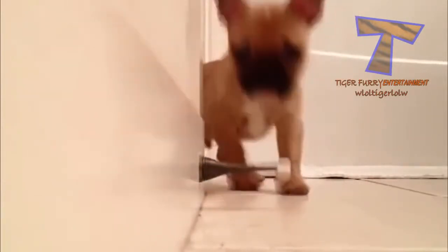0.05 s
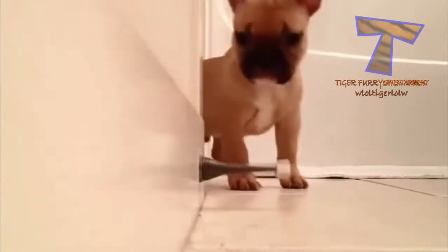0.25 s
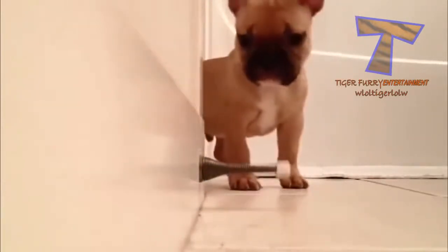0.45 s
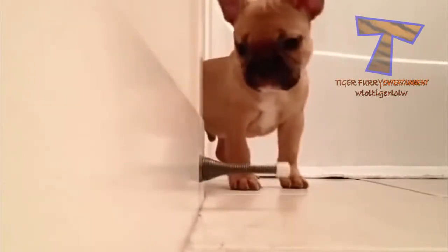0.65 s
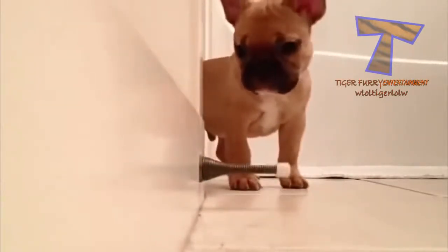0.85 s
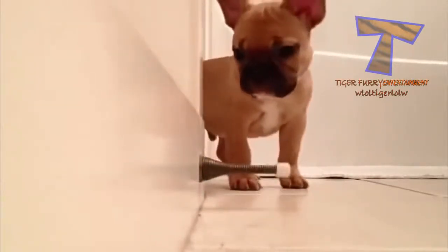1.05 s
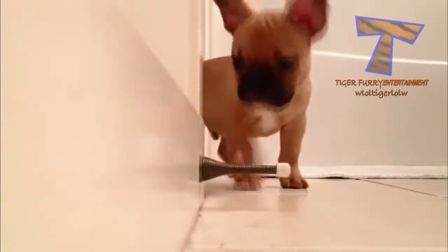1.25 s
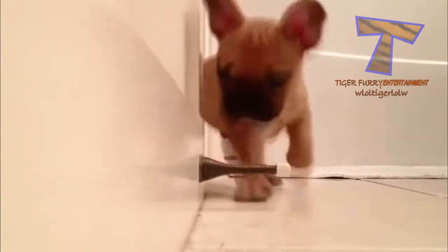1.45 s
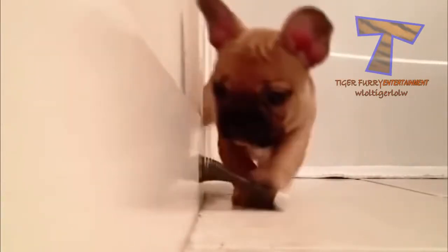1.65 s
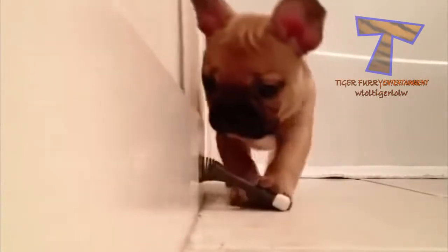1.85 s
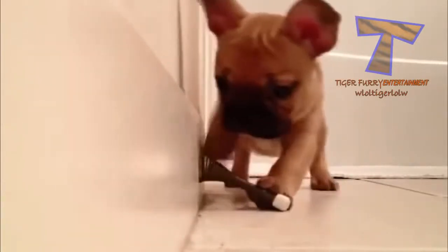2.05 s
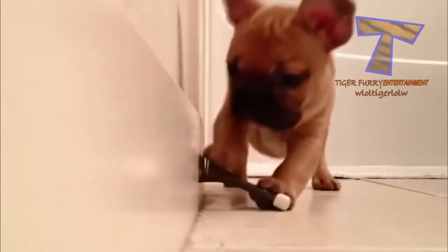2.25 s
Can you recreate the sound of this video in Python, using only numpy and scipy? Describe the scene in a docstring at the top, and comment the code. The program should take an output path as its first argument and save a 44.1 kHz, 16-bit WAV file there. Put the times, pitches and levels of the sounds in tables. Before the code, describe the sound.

A spring door stop twangs sharply, rattling into a buzzing boing that fades in a small tiled room

```python
"""A spring door stop, flicked by a puppy in a small tiled room, thrashes, settles into a buzzing boing,
then is pawed and snaps once more. Coil slaps drive filtered ticks, a dispersed wire clang and a door
knock and boom, with modal after-rings and dense reflections. Paw bumps are filtered contacts; soft
hisses (brush or sniff, sniffing breath, spring scraping) are shaped noise. Behind: a low hum of
wavering sines, noise for room air and rumble."""
import sys
import numpy as np
from scipy import signal
from scipy.fft import rfft, irfft
from scipy.io import wavfile
from scipy.ndimage import uniform_filter1d

SR = 44100
rng = np.random.default_rng(int(sys.argv[2]) if len(sys.argv) > 2 else 0)


def generate_wav(signal):
    """Clip the signal to [-1, 1] and save it as 16-bit WAV at the path in sys.argv[1]."""
    frames = np.transpose(np.atleast_2d(signal))
    scaled = np.clip(frames, -1, 1) * 32767
    pcm = np.round(scaled).astype(np.int16)
    wavfile.write(sys.argv[1], SR, pcm)


N = 101430

# slap strength through the boing: time_s, boom_db, knock_db, clang_db, tick_db
BOING_LEVELS = [(.55, -22.5, -25.5, -24.5, -26.5), (.63, -27, -30, -26, -22), (.72, -28.5, -23, -23.5, -23),
                (.8, -34.5, -29, -27, -26.5), (.87, -47, -25, -23, -26), (.925, -56, -30, -29.5, -35),
                (.955, -43, -24, -30.5, -25.5), (.985, -23.5, -24, -26.5, -23),
                (1.02, -36, -34.5, -22, -27.5), (1.075, -59, -26, -27.5, -31), (1.13, -50, -41, -57, -35.5),
                (1.185, -48, -37, -47, -47), (1.212, -35, -49, -35.5, -41),
                (1.24, -35.5, -35.5, -39.5, -38), (1.261, -50, -41.5, -38.5, -48),
                (1.29, -45, -59, -66, -48), (1.36, -61, -81, -64, -51), (1.46, -51, -67.5, -78, -59)]
# door knock through the boing: time_s, pitch_hz
KNOCK_PITCH = [(.55, 652), (.72, 637), (.88, 526), (1, 564), (1.25, 652)]
# second slap against the first: boom_db, knock_db, clang_db, tick_db
REBOUND_LEVELS = [-5, 1.9, 1.65, -6.5]
# further change of the second slap as the swing narrows: time_s, gain_db
REBOUND_FORCE_CURVE = [(.56, 2), (.64, 3), (.87, -5), (.94, -10), (1.04, -6), (1.25, 2.5)]
FIRST_SWING_S, SWING_COUNT = .5497, 31
PERIOD_S, PERIOD_SHRINK_S, PERIOD_MIN_S = .0363, .000475, .0263  # shrink per swing
REBOUND_S, REBOUND_SHRINK_S, REBOUND_MIN_S = .0143, .00044, .0058  # lag of the second slap
REBOUND_PITCH_RATIO = .97
TIME_SPREAD_S, LEVEL_SPREAD_DB, LOG_PITCH_SPREAD = .0003, 1, .1  # standard deviations


def swings():
    """Two slaps a swing; the swing shortens and the pair closes up as the spring calms."""
    n = np.arange(SWING_COUNT)
    period_s = np.maximum(PERIOD_S - PERIOD_SHRINK_S * n, PERIOD_MIN_S)
    first_s = FIRST_SWING_S + np.cumsum(period_s) - period_s
    second_s = first_s + np.maximum(REBOUND_S - REBOUND_SHRINK_S * n, REBOUND_MIN_S)

    level_s, *level_columns = np.transpose(BOING_LEVELS)
    first_db = np.transpose([np.interp(first_s, level_s, column) for column in level_columns])
    force_db = np.interp(first_s, *np.transpose(REBOUND_FORCE_CURVE))[:, None]
    second_db = first_db + REBOUND_LEVELS + force_db
    pitch_hz = np.interp(first_s, *np.transpose(KNOCK_PITCH))

    chance = rng.standard_normal((2 * SWING_COUNT, 6))
    slap_s = np.r_[first_s, second_s] + TIME_SPREAD_S * chance[:, 0]
    slap_db = np.vstack([first_db, second_db]) + LEVEL_SPREAD_DB * chance[:, 1:5]
    slap_hz = np.r_[pitch_hz, pitch_hz * REBOUND_PITCH_RATIO]
    slap_hz = slap_hz * np.exp(LOG_PITCH_SPREAD * chance[:, 5])
    return np.column_stack([slap_s, slap_db, slap_hz])


# single coil slaps: start_s, boom_db, knock_db, clang_db, tick_db, knock_pitch_hz
SINGLE_SLAPS = [(.2285, -9.5, -14.5, -14, -15.5, 660), (.2438, -15, -56, -18.5, -46, 550),
                (.2485, -25, -48, -22, -24, 450), (.2692, -19, -23, -38, -17, 680),
                (.2722, -13.5, -20.5, -18, -40, 447), (.2892, -12.5, -19, -25, -29, 620),
                (.305, -27, -16.5, -47, -36, 394), (.3132, -30, -37, -22.5, -27.5, 400),
                (.3405, -11.5, -15.5, -18.5, -14.5, 413), (.3553, -14, -20, -10, -26, 734),
                (.371, -40, -27, -40, -54, 545), (.3745, -19.5, -24.5, -40, -21, 417),
                (.3943, -22.5, -19, -16, -24.5, 460), (.419, -15.5, -30, -19.5, -33, 640),
                (.4335, -16.5, -24, -28, -28.5, 430), (.4538, -23.5, -24.5, -36, -23, 464),
                (.474, -27, -18.5, -18.5, -40, 665), (.4773, -25, -38, -30, -25.5, 500),
                (.491, -23, -28, -45, -24.5, 460), (.5125, -23.5, -32, -23.5, -28, 465),
                (.5155, -40, -19, -26, -19, 676), (.529, -20, -31.5, -27.5, -55, 543),
                (.943, -53, -27.5, -49, -69, 674), (.97, -40, -30, -35, -63, 550),
                (1.0015, -25.5, -33, -42, -62, 420), (1.0233, -30, -35, -39, -31, 636),
                (2.0153, -32, -25, -27, -27, 574), (2.0212, -50, -47, -39, -55, 633),
                (2.0262, -35, -57, -32.5, -52, 527), (2.0315, -49, -44, -43, -62, 476),
                (2.092, -67, -60, -57, -46, 505), (2.1045, -52, -59, -52, -63, 493),
                (2.1135, -41, -74, -45.5, -43.5, 507)]
# colour of the door boom: freq_hz, gain_db
BOOM_COLOUR = [(30, -42), (110, -36.5), (170, -21), (240, -7.5), (370, 1), (460, 1.5), (700, -24.5),
               (2000, -71)]
# colour of the wire clang: freq_hz, gain_db
CLANG_COLOUR = [(300, -37.5), (700, 0.5), (900, -7.5), (1350, 1), (2450, -2.5), (3000, -12), (3700, -12.5),
                (4400, -9), (5300, -24), (12000, -47)]
# colour of the coil tick: freq_hz, gain_db
TICK_COLOUR = [(1500, -25), (3300, -29), (4400, -6.5), (5300, -12), (6800, -1.5), (7900, 2.5),
               (9300, -10.5), (11000, -9.5), (11900, -4), (13000, -14), (14800, -7.5), (16000, -7)]
BOUNCE_MIN_S, BOUNCE_MAX_S, BOUNCE_DB = .002, .0045, -9.5  # coils bounce once after a slap
TICK_TRIM_DB, CLANG_TRIM_DB, KNOCK_TRIM_DB, BOOM_TRIM_DB = -3, -2, -.5, -4
KNOCK_LAG_S, BOOM_LAG_S = .00064, .00089
WET_BODY_DB, WET_CLANG_DB, WET_TICK_DB = -4, -4.5, -8


def spring():
    """Slapping coils tick first and clang along the wire; the door's knock and boom follow."""
    slaps = np.vstack([SINGLE_SLAPS, swings()])
    start_s, boom_db, knock_db, clang_db, tick_db, knock_hz = slaps.T

    bounce_s = start_s + rng.uniform(BOUNCE_MIN_S, BOUNCE_MAX_S, len(start_s))
    bounces = contacts(bounce_s, tick_db + BOUNCE_DB, spread_s=.00097, scatter=3.3)
    tick_blows = contacts(start_s, tick_db, spread_s=.0012, scatter=5.2)
    tick = amp(TICK_TRIM_DB) * ring(tick_blows + bounces, TICK_COLOUR)

    clang_blows = contacts(start_s, clang_db, spread_s=.0016, scatter=1)
    chirps = dispersed(clang_blows + chatter(clang_blows))
    clang = amp(CLANG_TRIM_DB) * ring(chirps, CLANG_COLOUR)

    knock = amp(KNOCK_TRIM_DB) * knocks(start_s + KNOCK_LAG_S, knock_db, knock_hz)
    boom_blows = contacts(start_s + BOOM_LAG_S, boom_db, spread_s=.0029, scatter=.82)
    boom = amp(BOOM_TRIM_DB) * ring(boom_blows, BOOM_COLOUR)

    body = boom + knock
    ringing = door_ring(body + clang) + wire_ring(tick + clang)
    wet = amp(WET_BODY_DB) * body + amp(WET_CLANG_DB) * clang + amp(WET_TICK_DB) * tick
    return body + clang + tick + ringing + room(wet, build_s=.0032)


CHATTER_PER_S, CHATTER_FADE_S, CHATTER_DB = 700, .029, -4.5


def chatter(blows):
    """Loose coils touch at random, with an energy that fades after each blow."""
    keep = np.exp(-1 / (CHATTER_FADE_S * SR))
    energy = signal.lfilter([1 - keep], [1, -keep], blows ** 2)
    hits = rng.random(N) < CHATTER_PER_S / SR
    signs = rng.choice([-1, 1], N)
    touches = hits * signs * amp(rng.uniform(-2.1, 1.5, N))
    return amp(CHATTER_DB) * np.sqrt(energy) * evened(touches)


GLIDE_S, GLIDE_TOP_HZ = .0026, 3500  # lag two octaves below the top; no lag above it


def dispersed(x):
    """Low notes travel slower along the wire, so each click becomes a short falling chirp."""
    hz = np.fft.rfftfreq(2 * N, 1 / SR)
    slowness = np.sqrt(GLIDE_TOP_HZ / np.maximum(hz, 500))
    lag_s = GLIDE_S * np.maximum(slowness - 1, 0)
    phase = -2 * np.pi * np.cumsum(lag_s) * hz[1]  # integrated group delay
    return irfft(rfft(x, 2 * N) * np.exp(1j * phase))[:N]


KNOCK_RISE_S = .0013  # envelope peak


def knocks(times_s, levels_db, pitches_hz):
    """The door panel gives a few quickly dying swings under each slap."""
    out = np.zeros(N)
    t = np.arange(SR // 40) / SR
    for start_s, level_db, pitch_hz in zip(times_s, levels_db, pitches_hz):
        wave = t * np.exp(-t / KNOCK_RISE_S) * np.sin(2 * np.pi * pitch_hz * t)
        add(out, start_s, -10 * amp(level_db) * wave / np.linalg.norm(wave))
    highpass = signal.butter(3, 260, "high", fs=SR, output="sos")
    return signal.sosfilt(highpass, out)


# door modes: freq_hz, level_db
DOOR_MODES = [(200, -4), (243, 0.5), (274.5, -4), (320, -3.5), (329.4, -4), (365, -9), (388.5, -4),
              (417, -8), (443, -6.5), (465, -5.5), (527, -10), (607, -17.5), (648, -10.5), (678, -12.5),
              (728, -7.5), (962, -7.5), (1404, 1), (1927, -0.5)]
DOOR_RING_DB, DOOR_T60_S = -50.5, .5


def door_ring(x):
    """The struck door rings on in its own modes."""
    return amp(DOOR_RING_DB) * after_ring(x, DOOR_MODES, DOOR_T60_S)


# wire modes: freq_hz, level_db
WIRE_MODES = [(4240, -5.5), (4350, -3), (4540, -13), (7520, -20), (7730, -26), (7940, -27)]
WIRE_RING_DB, WIRE_T60_S = -60, .92


def wire_ring(x):
    """The struck wire leaves a thin, high after-ring."""
    return amp(WIRE_RING_DB) * after_ring(x, WIRE_MODES, WIRE_T60_S)


def after_ring(x, modes, t60_s):
    """Modes that ring on after every blow; the lowest lasts t60_s, higher ones die sooner."""
    t = np.arange(SR) / SR
    lowest_hz = modes[0][0]
    response = np.zeros(SR)
    for hz, level_db in modes:
        decay_db = -60 * t / t60_s * np.sqrt(hz / lowest_hz)
        response += amp(level_db + decay_db) * np.sin(2 * np.pi * hz * t)
    return signal.fftconvolve(x, response)[:N]


# paw bumps: start_s, thud_db, knock_db, scuff_db, claw_db
PAW_BUMPS = [(.046, -32, -40, -45.5, -50), (0.0601, -38.5, -65, -48, -62), (0.2185, -29, -38, -36, -80),
             (1.869, -32, -58, -42.5, -48), (1.9139, -49, -61, -56, -43)]
# colour of a paw thud: freq_hz, gain_db
THUD_COLOUR = [(30, -45), (110, -23), (180, -10), (380, 6), (500, -11), (900, -23), (2000, -63)]
# colour of a claw tick: freq_hz, gain_db
CLAW_COLOUR = [(1500, -15), (4400, -18), (6000, -12), (15000, -14)]
PAW_KNOCK_HZ, PAW_DRY_DB, PAW_WET_DB = 750, -1.5, -5


def paws():
    """Soft paws thud and scuff on the spring, claws tick, and the door behind knocks and rings."""
    start_s, thud_db, knock_db, scuff_db, claw_db = np.transpose(PAW_BUMPS)
    thud = ring(contacts(start_s, thud_db, spread_s=.0018, scatter=1), THUD_COLOUR)
    knock = knocks(start_s, knock_db, np.full(len(start_s), PAW_KNOCK_HZ))
    scuff = ring(contacts(start_s, scuff_db, spread_s=.0047, scatter=3.6), CLANG_COLOUR)
    claw = ring(contacts(start_s, claw_db, spread_s=.0039, scatter=3), CLAW_COLOUR)
    bumps = thud + knock + scuff + claw
    reflections = amp(PAW_WET_DB) * room(bumps, build_s=.0017)
    return amp(PAW_DRY_DB) * bumps + reflections + door_ring(bumps)


# soft hisses: middle_s, half_length_s, dull_db, bright_db
SOFT_HISSES = [(.052, 0.031, -58.5, -43.5), (1.49, 0.017, -57.5, -91), (1.577, 0.056, -62, -91),
               (1.69, 0.028, -60.5, -67), (1.925, 0.063, -55, -55.5), (2.116, 0.04, -81, -59)]
# colour of the dull hiss: freq_hz, gain_db
DULL_COLOUR = [(300, -9), (900, 0), (2400, 12), (3300, 0), (4300, 10), (5200, -6), (7000, 5.5), (9000, -14),
               (15000, -12)]
# colour of the bright hiss: freq_hz, gain_db
BRIGHT_COLOUR = [(1000, -11), (4500, -5.5), (5900, 0), (7000, -8), (8000, 0), (10000, -6), (12100, 3.5),
                 (13200, -9), (15000, -10), (15600, -25)]
HISS_TRIM_DB = -2


def hisses():
    """Swells of noise: a paw brush or sniff, the puppy's sniffing breath, then the spring scraping."""
    t = np.arange(N) / SR
    dull, bright = noise(DULL_COLOUR), noise(BRIGHT_COLOUR)
    out = np.zeros(N)
    for middle_s, half_length_s, dull_db, bright_db in SOFT_HISSES:
        swell = np.exp(-((t - middle_s) / half_length_s) ** 2 / 2)
        out += swell * (amp(dull_db) * dull + amp(bright_db) * bright)
    return amp(HISS_TRIM_DB) * out


# decay of the reflections: freq_hz, t60_s
ROOM_DECAY = [(200, 0.37), (530, 0.31), (1400, 0.15), (3700, 0.54), (8000, 0.087), (14000, 0.42)]


def room(x, build_s):
    """Dense reflections from tiles and walls, each band dying at its own speed."""
    t = np.arange(SR) / SR
    hz, frame_s, bands = signal.stft(rng.standard_normal(SR), SR, nperseg=256)
    decay = amp(-60 * frame_s / read(ROOM_DECAY, hz)[:, None])
    tail = signal.istft(bands * decay, SR, nperseg=256)[1][:SR]
    build = 1 - np.exp(-(t / build_s) ** 2)
    spectrum = rfft(tail * build)
    smooth_power = uniform_filter1d(abs(spectrum) ** 2, size=45)
    tail = build * irfft(spectrum / np.sqrt(smooth_power), SR)  # level spectrum
    return signal.fftconvolve(x, tail[:SR // 2])[:N]


# hum tones: freq_hz, level_db
HUM_TONES = [(120, -57), (210, -58.5), (240, -66), (271, -63)]
LOWEST_WAVER_HZ, UPPER_WAVER_HZ = .2, 5  # rms


def hum():
    """A mains hum: a nearly steady lowest tone under slightly wavering upper tones."""
    t = np.arange(N) / SR
    out = np.zeros(N)
    for k, (hz, level_db) in enumerate(HUM_TONES):
        drift = evened(uniform_filter1d(rng.standard_normal(N), size=3000))
        waver_hz = (UPPER_WAVER_HZ if k else LOWEST_WAVER_HZ) * drift
        cycles = hz * t + np.cumsum(waver_hz) / SR + rng.random()
        out += amp(level_db) * np.sqrt(2) * np.sin(2 * np.pi * cycles)
    return out


# colour of the room air: freq_hz, gain_db
AIR_COLOUR = [(25, -54), (80, -46), (140, -7), (234, 0), (572, -21), (1770, -24.5), (2690, -26.5),
              (7380, -28), (8480, -36.5), (13900, -34), (16000, -47)]
AIR_DB = -56


def air():
    """Faint room air: steady coloured noise."""
    return amp(AIR_DB) * noise(AIR_COLOUR)


# colour of the rumble: freq_hz, gain_db
RUMBLE_COLOUR = [(20, -14), (220, 0), (1500, -45)]
RUMBLE_DB = -80


def rumble():
    """Very faint low noise, drawn afresh for each channel."""
    return amp(RUMBLE_DB) * noise(RUMBLE_COLOUR)


def amp(db):
    """Decibels to gain."""
    return 10 ** (np.asarray(db) / 20)


def evened(x):
    """Scales to rms 1."""
    return x / np.sqrt(np.mean(x ** 2) + 1e-20)


def read(points, hz):
    """Reads a table on a log-frequency axis."""
    point_hz, value = np.transpose(points)
    return np.interp(np.log(hz + 1), np.log(point_hz + 1), value)


def add(mix, start_s, sound):
    """Mixes a sound in at a time."""
    part = mix[max(round(start_s * SR), 0):][:len(sound)]
    part += sound[:len(part)]


def noise(colour):
    """Steady noise of rms 1 with the given colour."""
    gain = amp(read(colour, np.fft.rfftfreq(N, 1 / SR)))
    return evened(irfft(rfft(rng.standard_normal(N)) * gain, N))


def ring(x, colour, size=4096):
    """Causal minimum-phase filter of unit energy with the given colour."""
    hz = abs(np.fft.fftfreq(size, 1 / SR))
    log_gain = np.log(amp(read(colour, hz)))
    response = np.fft.ifft(np.exp(np.conj(signal.hilbert(log_gain)))).real[:size // 2]
    return signal.fftconvolve(x, response / np.linalg.norm(response))[:N]


def contacts(times_s, levels_db, spread_s, scatter):
    """Each blow is one push followed by a short random scatter of smaller contacts."""
    out = np.zeros(N)
    t = np.arange(SR // 50) / SR
    for start_s, level_db in zip(times_s, levels_db):
        burst = rng.standard_normal(len(t)) * np.sqrt(t / spread_s) * np.exp(-t / spread_s)
        burst *= scatter / np.linalg.norm(burst)
        burst[0] += 1
        add(out, start_s, 10 * amp(level_db) * burst / np.sqrt(1 + scatter ** 2))
    return out


# left over right: freq_hz, difference_db
CHANNEL_BALANCE = [(150, 0), (300, .9), (550, .1), (1000, 0)]


def scene():
    """Sums all sources, almost equal in both channels, with separate rumble in each."""
    spectrum = rfft(spring() + paws() + hisses() + hum() + air())
    half_db = read(CHANNEL_BALANCE, np.fft.rfftfreq(N, 1 / SR)) / 2
    left = irfft(spectrum * amp(half_db), N) + rumble()
    right = irfft(spectrum * amp(-half_db), N) + rumble()
    return np.array([left, right])


EDGE_HZ = 15600


def record(dry):
    """The recorder's band limit: a linear-phase low-pass at EDGE_HZ."""
    lowpass = signal.firwin(255, EDGE_HZ, window=("kaiser", 9), fs=SR)
    return signal.oaconvolve(dry, lowpass[None], "same")


dry = scene()
out = record(dry)
generate_wav(out)
```